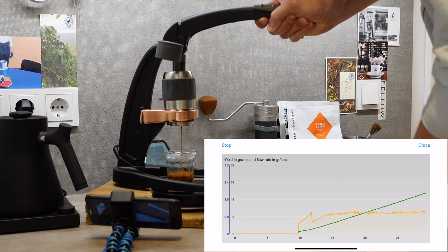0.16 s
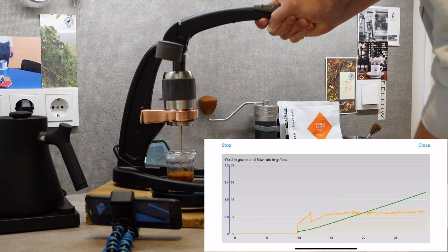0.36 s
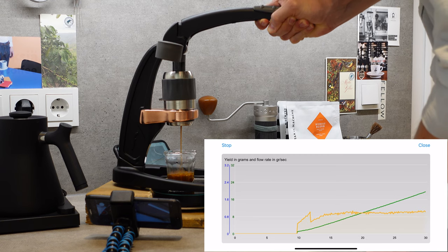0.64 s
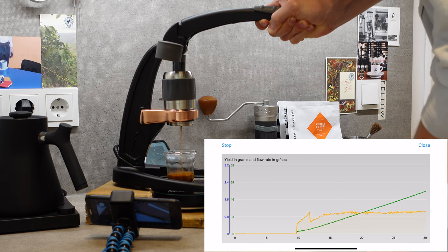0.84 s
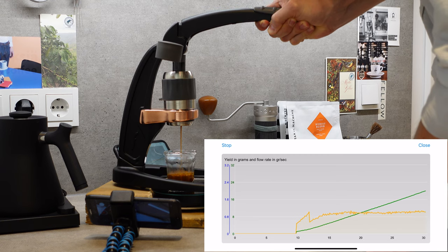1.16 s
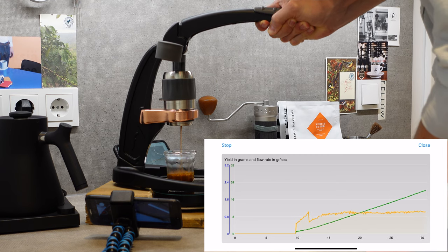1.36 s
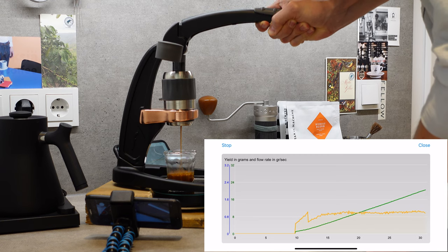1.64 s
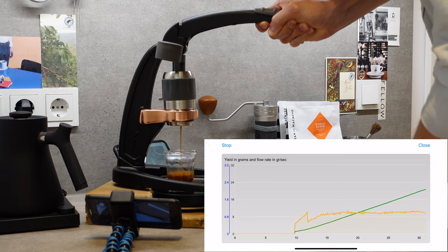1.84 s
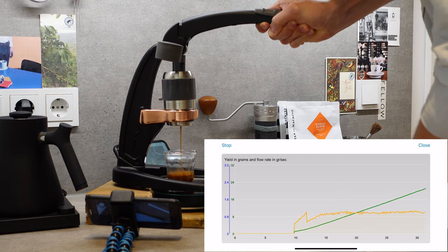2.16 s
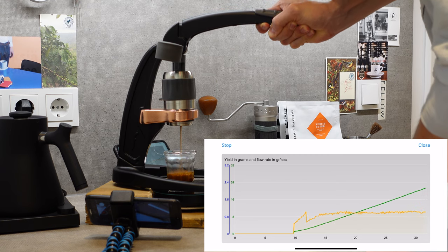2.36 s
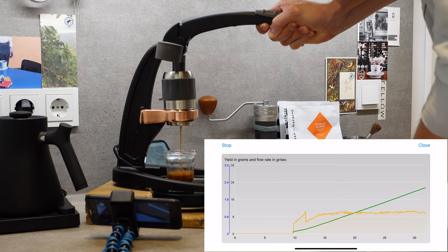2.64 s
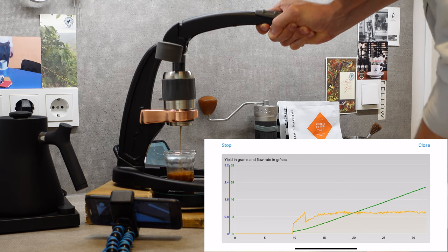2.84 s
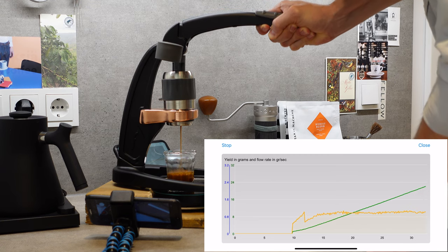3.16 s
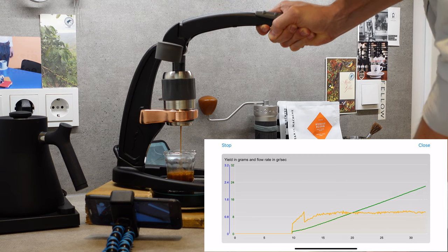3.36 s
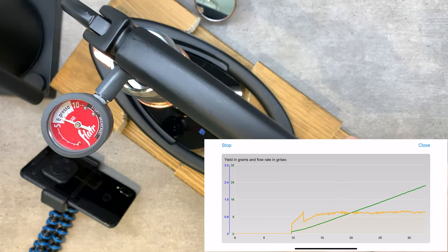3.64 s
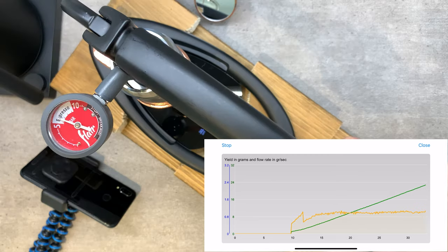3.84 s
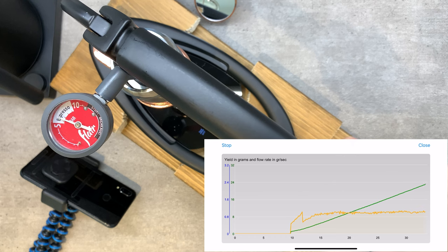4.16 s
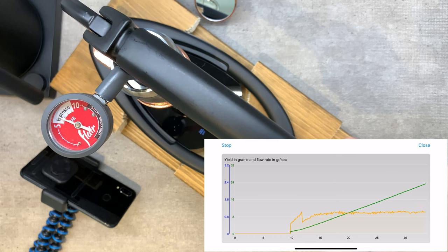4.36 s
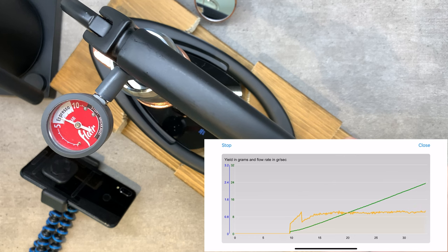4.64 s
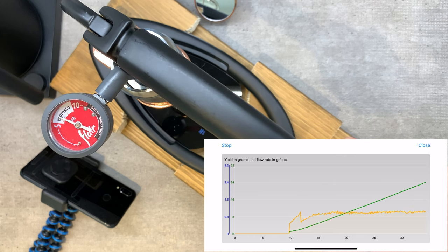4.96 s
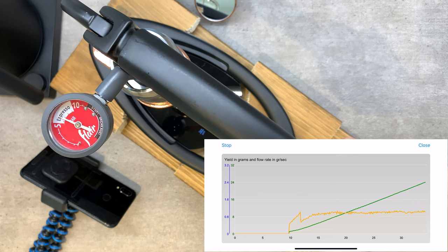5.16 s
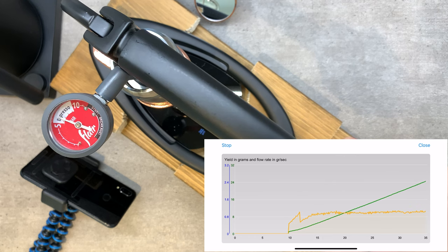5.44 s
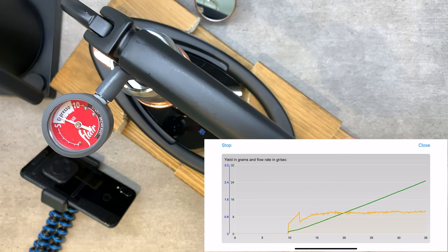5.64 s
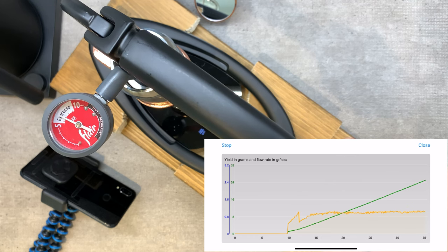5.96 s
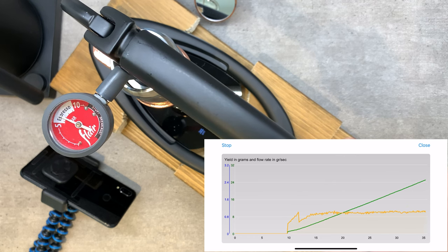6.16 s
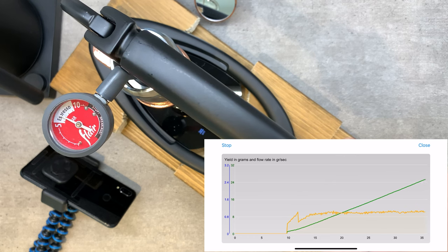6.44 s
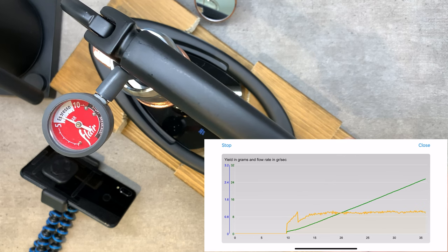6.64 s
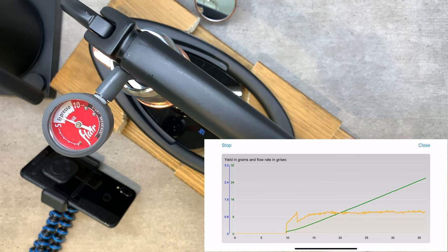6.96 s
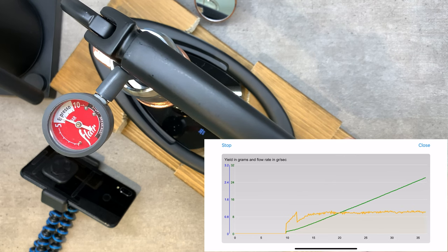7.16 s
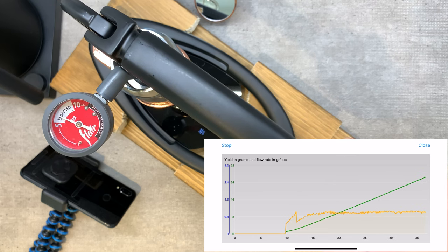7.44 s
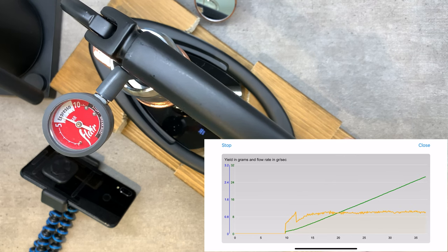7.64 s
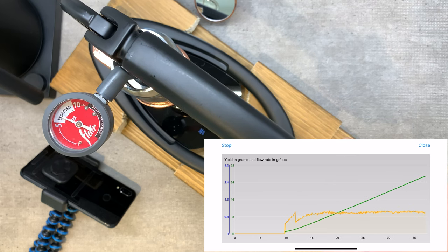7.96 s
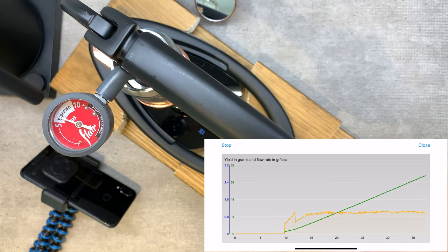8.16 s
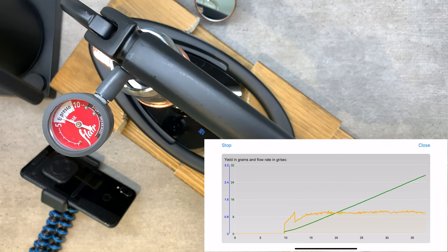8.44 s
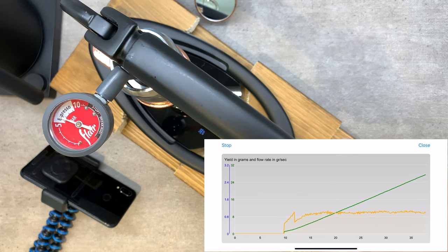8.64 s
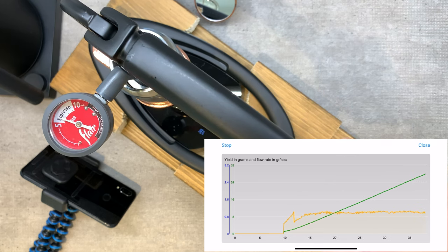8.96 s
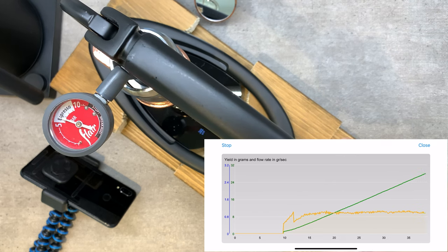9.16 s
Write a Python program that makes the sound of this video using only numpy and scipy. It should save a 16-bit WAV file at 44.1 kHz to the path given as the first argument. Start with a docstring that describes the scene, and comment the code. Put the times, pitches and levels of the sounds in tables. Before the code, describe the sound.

Close stereo sound of espresso dribbling into a little glass in a quiet indoor kitchen. Crisp bubble ticks come in uneven clumps, with a soft watery ring from the air in the glass. Low rumble, thin wash and faint hum stay behind. Two dull bumps fall near three seconds; a clinking bump and a cluster of low thuds follow between about 5.7 and 6.6, then the trickle continues alone.

```python
"""Small glass on a counter in a quiet kitchen, two-port microphone close by, about nine seconds.
From the start a thin coffee stream pops and fizzes: decaying blips that also ring the air in the glass,
higher early on; rumble, wash and hum lie behind it throughout, made of shaped noise and wavering tones.
From half a second faint sine hoots come and go; from one second gurgles blur in as narrow noise.
Near 2.8 s, then between 5.7 and 6.6 s, low sine thuds come through the counter with rattle and clink."""
import sys
import numpy as np
from scipy import signal
from scipy.fft import rfft, irfft, next_fast_len
from scipy.io import wavfile

SR = 44100
rng = np.random.default_rng(int(sys.argv[2]) if len(sys.argv) > 2 else 0)


def output_pcm(signal):
    """Save a mono or channel-first signal as 16-bit PCM at the path in sys.argv[1].

    Samples are clipped to [-1, 1] before scaling.
    """
    pcm = np.clip(np.atleast_2d(signal).T, -1, 1) * 32767
    wavfile.write(sys.argv[1], SR, np.round(pcm).astype(np.int16))


N = 409688

# All levels below are relative: filters, trims and slow drift act on them later.
# Clearest pops at the surface: t/s, tick f/Hz, tick level/dB, tick top level/dB, low edge level/dB,
# first air mode level/dB, second air mode f/Hz, second air mode level/dB
CLEAR_POPS = [(0.0213, 7440, -48.5, -52, -63, -53, 1960, -57),
              (0.1254, 5430, -44.5, -50, -56, -33, 1950, -54),
              (0.1377, 7040, -44, -56, -70, -40, 2040, -61), (0.158, 6950, -69, -72, -73, -44.5, 1920, -71),
              (0.1776, 6310, -55, -60, -55, -39, 2560, -48), (0.228, 7250, -52, -45, -58, -50.5, 2120, -66),
              (0.2654, 7150, -43, -37, -61, -52.5, 2560, -58),
              (0.2938, 9100, -61, -38, -67, -55, 2520, -59), (0.3374, 7500, -56, -69, -68, -44, 2040, -63),
              (0.373, 7000, -51, -71, -57, -49, 2470, -64), (0.3874, 6850, -41.5, -44, -58, -49, 2480, -63),
              (0.418, 5340, -37.5, -57, -67, -53, 2430, -74),
              (0.443, 5630, -35.5, -42, -67, -55, 2310, -77), (0.4558, 6940, -42, -55, -51, -49, 2200, -78),
              (0.494, 7340, -51, -48, -77, -58, 2460, -79),
              (0.5352, 7480, -48, -52, -61, -50.5, 2250, -54.5),
              (0.946, 5570, -42.5, -50, -59, -56, 2470, -70),
              (1.0693, 7560, -40.5, -51, -57, -52, 2500, -43),
              (1.2312, 6700, -45.5, -52, -48, -36, 2400, -44.5),
              (1.244, 6160, -52, -52, -57, -47, 2070, -48), (1.5, 6400, -37.5, -60, -77, -52, 2370, -54),
              (1.527, 7400, -38.5, -61, -75.5, -62, 2500, -50),
              (1.5558, 7550, -40.5, -52, -82, -58, 2010, -50),
              (1.666, 7400, -47.5, -47, -80, -57, 2340, -59), (1.6843, 9300, -67, -31, -80, -71, 2170, -63),
              (1.7134, 8110, -60, -52, -60, -59, 2480, -54),
              (1.7354, 6970, -62, -61, -48, -41.5, 2280, -40.5),
              (1.7439, 7500, -42, -53, -49, -42, 2480, -43),
              (1.753, 6100, -31.5, -48, -51, -40.5, 2500, -48),
              (1.7924, 6200, -64, -50, -55.5, -42, 2390, -47), (1.902, 7600, -48, -78, -82, -48, 1940, -59),
              (1.976, 7510, -59, -56, -61, -49, 2470, -57), (1.991, 6750, -40, -44, -73, -46, 2430, -63),
              (2.1182, 5740, -56, -53, -55, -49, 2470, -68),
              (2.1695, 7000, -49.5, -51, -52, -58, 2500, -57),
              (2.211, 6800, -46, -53, -63, -48.5, 2370, -68),
              (2.2994, 6950, -34, -41.5, -42, -59, 2490, -64),
              (2.3115, 7600, -59, -43, -63, -66, 2070, -61),
              (2.344, 7440, -47, -39.5, -48, -49.5, 1970, -49),
              (2.3575, 8850, -56, -48, -58, -68, 2000, -61), (2.4814, 7800, -52, -49, -64, -57, 2250, -71),
              (2.582, 7900, -47.5, -53, -72, -50, 2460, -62), (2.6967, 5920, -80, -88, -74, -49, 2120, -62),
              (2.7716, 7800, -53.5, -41.5, -59, -63, 2240, -75),
              (3.149, 6110, -86, -69, -89, -46, 2240, -51.5),
              (3.237, 7800, -44.5, -43, -80, -71, 2220, -58), (3.2535, 8050, -56, -52, -75, -66, 2270, -57),
              (3.2624, 9160, -64, -44, -82, -61, 2250, -56),
              (3.3282, 4670, -39.5, -47, -53.5, -54, 2270, -72),
              (3.4057, 5230, -47.5, -72, -56, -44.5, 2320, -53.5),
              (3.475, 9450, -58, -51, -66, -65, 2240, -76), (3.6453, 8500, -60, -71, -72, -43.5, 2070, -61),
              (3.662, 8250, -77, -79, -80, -44.5, 2260, -63),
              (3.7133, 5600, -51.5, -63, -59, -37.5, 2230, -48),
              (3.839, 5490, -60, -59, -67, -42.5, 2220, -48.5),
              (3.8558, 7360, -42, -51, -79, -43.5, 2280, -43),
              (3.9682, 6070, -54, -72, -73, -50, 2290, -50),
              (4.1365, 7000, -49.5, -50, -55, -70, 2320, -56),
              (4.24, 7000, -49.5, -53, -49, -84, 2180, -50),
              (4.3949, 7000, -34, -40, -59, -51.5, 2520, -53), (4.413, 6940, -44, -51, -59, -66, 2480, -57),
              (4.4318, 7450, -49, -48, -50, -56, 2470, -51),
              (4.4518, 6700, -31.5, -44, -62, -48.5, 2410, -54),
              (4.468, 8030, -52, -41, -71, -46.5, 2360, -54), (4.4897, 5700, -35, -54, -70, -53, 2210, -59),
              (4.5033, 6400, -32.5, -39, -75, -57, 2260, -60), (4.515, 6610, -64, -63, -74, -52, 2260, -54),
              (4.5931, 7100, -39, -55, -48, -57, 2240, -69), (4.663, 5400, -41, -58, -58, -58, 2200, -50),
              (4.7296, 7360, -46, -76, -76, -62, 2230, -64), (5.071, 8970, -60, -45, -70, -81, 2250, -78),
              (5.1692, 5840, -47.5, -45, -66, -54, 2240, -55),
              (5.188, 7300, -43.5, -50, -65, -67, 2230, -54), (5.2082, 7340, -42, -50, -76, -63, 2190, -49),
              (5.2212, 7500, -41, -42.5, -78, -73, 2110, -49),
              (5.2305, 6960, -37.5, -49, -80, -82, 2310, -49.5),
              (5.2704, 7400, -40.5, -56, -75, -56, 2150, -44.5),
              (5.282, 8690, -54, -49, -78, -59, 2340, -55), (5.322, 7840, -44.5, -45, -69, -68, 2330, -68),
              (5.35, 6250, -49.5, -72, -70, -53, 2190, -44), (5.408, 5400, -62, -80, -67, -61, 2230, -50.5),
              (5.4385, 6900, -40.5, -44.5, -66, -67, 2170, -65),
              (5.4857, 9080, -72, -44.5, -71, -57, 2380, -60),
              (5.591, 5600, -41.5, -49, -71, -55, 2330, -65), (5.6427, 5790, -66, -61, -68, -50, 2190, -45),
              (5.6754, 6600, -41.5, -35, -51, -58, 2540, -54), (5.708, 5500, -47, -62, -53, -73, 2420, -64),
              (5.9105, 7100, -43, -57, -85, -64, 2330, -60),
              (6.0097, 6190, -63, -67, -72, -49.5, 2020, -54),
              (6.053, 6000, -53.5, -61, -67, -59, 2190, -49), (6.1149, 6560, -55, -51, -66, -69, 2200, -66),
              (6.1647, 6850, -43, -49.5, -56, -61, 2140, -45.5),
              (6.2075, 6300, -42, -55, -71, -50, 2190, -42.5),
              (6.2192, 7170, -67, -49, -72, -52, 1940, -45),
              (6.3355, 7000, -51, -74, -66, -55.5, 2190, -47),
              (6.4072, 6700, -37.5, -48, -73, -62, 2190, -44.5),
              (6.424, 6760, -52, -60, -68, -74, 2460, -59), (6.439, 7000, -39, -44, -63, -46, 2250, -47.5),
              (6.4979, 6050, -31, -51, -54, -69, 2150, -60), (6.5539, 6900, -32, -42, -50, -56, 2190, -46),
              (6.573, 7800, -42, -54, -67, -73, 2160, -56),
              (6.642, 5950, -36.5, -46, -43.5, -56, 2170, -44.5),
              (6.68, 5800, -40, -54, -63, -71, 2200, -49),
              (6.7176, 6900, -37, -39.5, -48.5, -52.5, 2220, -66),
              (6.734, 8500, -44, -51, -67, -64, 2350, -70), (6.7787, 6550, -70, -77, -72, -56, 2150, -47),
              (6.9133, 8800, -43, -57, -68, -67, 2190, -58.5),
              (6.9307, 8500, -51, -47, -84, -73, 2180, -62), (7.0033, 6500, -41, -55, -53, -65, 2130, -49),
              (7.1715, 7900, -35, -51, -72, -61, 2130, -51),
              (7.2828, 6400, -48.5, -79, -71, -57, 2160, -50),
              (7.5716, 6030, -52, -42, -62, -63, 2200, -55), (7.579, 9500, -69, -36, -63, -54.5, 2160, -59),
              (7.6194, 6920, -60, -49, -52, -44.5, 2190, -37),
              (7.6364, 5870, -54, -58, -62, -46, 2330, -47),
              (7.7848, 5960, -44.5, -49, -85, -71, 2200, -66),
              (7.8635, 9500, -57, -42, -65, -66, 2100, -63),
              (7.9021, 7400, -44.5, -43, -62, -62, 2190, -52.5),
              (7.9505, 6690, -56, -67, -57, -54, 2210, -44), (7.961, 6470, -33, -37, -49, -40, 2190, -36.5),
              (7.975, 6070, -41, -51, -57, -40, 2200, -42), (7.9879, 6400, -61, -61, -62, -40.5, 2190, -42),
              (7.9955, 6600, -62, -60, -68, -52, 2260, -53), (8.079, 5650, -41, -60, -72, -78, 2130, -61),
              (8.1092, 6100, -44, -50, -58, -73, 2230, -73),
              (8.3757, 6160, -57, -66, -71, -73, 2150, -46.5),
              (8.3893, 5860, -42, -64, -78, -76, 2140, -52),
              (8.484, 6800, -47.5, -53, -54.5, -50, 2180, -44),
              (8.5282, 6960, -37, -46, -43.5, -59, 2240, -47.5),
              (8.636, 7650, -53, -74, -61, -50, 2120, -50), (8.6539, 6000, -35, -43, -70, -59, 2370, -49.5),
              (8.859, 7900, -49, -51, -62, -49, 2130, -29), (8.8788, 6990, -72, -64, -74, -68, 2130, -59),
              (8.8882, 6700, -55, -43.5, -68, -59, 2190, -37.5),
              (8.8988, 8140, -69, -62, -75, -65, 2200, -41), (8.9121, 6530, -71, -61, -82, -57, 2150, -57),
              (8.9428, 5320, -58, -59, -72, -68, 2200, -47),
              (9.0144, 5540, -36.5, -49, -69, -77, 2120, -64),
              (9.0618, 6900, -41, -44, -43.5, -62, 2150, -66),
              (9.0785, 6450, -46, -55, -53, -53.5, 2150, -56), (9.149, 9500, -66, -46, -73, -70, 2070, -68),
              (9.1868, 8650, -58, -53, -63, -64, 2200, -51.5),
              (9.2454, 7240, -44, -55, -60, -61, 2160, -37),
              (9.2564, 5960, -34, -40.5, -56, -56, 2200, -39.5),
              (2.8208, 7500, -57, -60, -62, -55.5, 2210, -69),
              (2.847, 7500, -57, -69, -72, -56.5, 2210, -69), (2.8801, 7400, -59, -75, -66, -62, 2210, -70),
              (2.9465, 7500, -74, -73, -79, -58, 2220, -66), (2.9877, 7500, -81, -60, -86, -60, 2200, -73),
              (3.088, 7500, -84, -95, -90, -54.5, 2200, -73),
              (5.8166, 6500, -67, -77, -67, -64, 2200, -58.5),
              (8.3015, 7200, -60, -76, -80, -70, 2190, -61), (8.3165, 7100, -55, -79, -80, -76, 2190, -65),
              (8.3385, 7200, -64, -76, -80, -71, 2190, -61), (0.1148, 7950, -80, -86, -81, -52, 1910, -72),
              (0.132, 7200, -59, -61, -76, -83, 1960, -82), (0.2727, 7490, -48, -57, -71, -83, 1900, -61),
              (0.2845, 5840, -64, -57, -84, -83, 2170, -84), (0.3043, 7440, -52, -65, -81, -58, 2520, -55),
              (0.3216, 7210, -72, -67, -83, -54, 2490, -72), (0.5047, 7450, -66, -60, -81, -62, 1910, -82),
              (0.5221, 7330, -76, -54, -81, -83, 1990, -74),
              (0.6648, 7700, -59, -61, -75, -52.5, 2050, -53),
              (0.6834, 6280, -69, -54, -78, -81, 1950, -62), (0.74, 7530, -69, -81, -87, -55, 1910, -72),
              (0.7756, 5750, -50.5, -77, -84, -54, 1910, -80),
              (0.8866, 7400, -58, -56, -73, -70, 2350, -59),
              (0.8981, 7310, -76, -81, -84, -55.5, 1910, -75), (1.032, 7470, -82, -62, -84, -54, 2490, -58),
              (1.0829, 7340, -66, -80, -69, -83, 2410, -59), (1.1112, 7450, -55, -56, -74, -76, 1910, -69),
              (1.1238, 7520, -60, -56, -73, -52, 1970, -55), (1.1904, 8400, -54, -56, -50, -83, 2560, -64),
              (1.2134, 5590, -52, -68, -64, -59, 2600, -53), (1.2252, 5010, -66, -76, -67, -60, 1850, -44),
              (1.2615, 5740, -80, -63, -81, -45, 1890, -46), (1.3119, 7550, -64, -60, -75, -56, 1910, -69),
              (1.4145, 7600, -51, -53, -77, -59, 1960, -52), (1.4239, 7500, -63, -63, -84, -67, 1950, -84),
              (1.437, 7540, -73, -48, -85, -84, 1940, -78), (1.4783, 7410, -59, -51, -79, -70, 1910, -77),
              (1.5137, 7460, -48, -71, -73, -51.5, 2540, -56),
              (1.5411, 7590, -62, -63, -81, -71, 1910, -64),
              (1.6158, 7630, -80, -77, -81, -52, 1930, -51.5),
              (1.6994, 7500, -52, -54, -59, -65, 2120, -58), (1.7274, 5990, -72, -71, -69, -53, 2430, -54),
              (1.7795, 5780, -60, -67, -70, -47, 2480, -82),
              (1.7972, 6070, -80, -81, -81, -83, 2520, -47.5),
              (1.838, 7430, -73, -81, -78, -54.5, 1920, -52), (1.9114, 7860, -67, -81, -79, -60, 1910, -63),
              (1.9284, 7690, -60, -71, -81, -71, 2570, -64), (1.9403, 7750, -52, -54, -61, -58, 2200, -61),
              (2.0025, 7440, -60, -67, -74, -51, 1910, -64), (2.011, 5000, -43.5, -66, -75, -83, 2230, -73),
              (2.028, 7500, -59, -53, -65, -83, 2110, -79), (2.035, 7500, -49, -59, -72, -83, 2120, -73),
              (2.0566, 5810, -69, -53, -84, -56, 2210, -78), (2.1953, 7300, -55, -58, -81, -53, 1930, -57),
              (2.2684, 7480, -54, -64, -60, -59, 2210, -66), (2.2825, 7390, -69, -81, -71, -59, 1930, -68),
              (2.3227, 7430, -80, -81, -65, -83, 2330, -82), (2.387, 6210, -55, -61, -60, -54, 2540, -60),
              (2.469, 7660, -48.5, -54, -59, -52.5, 2260, -65),
              (2.497, 6370, -61, -51, -81, -65, 1910, -77), (2.5181, 7580, -63, -66, -78, -52.5, 1910, -72),
              (2.5676, 7350, -46.5, -61, -77, -60, 2270, -68),
              (2.5915, 7530, -68, -71, -81, -85, 2210, -66), (3.115, 7360, -81, -86, -90, -55, 1910, -69),
              (3.2034, 7770, -59, -62, -81, -87, 2280, -54.5), (3.211, 7540, -55, -58, -81, -52, 2240, -82),
              (3.2286, 7660, -59, -81, -81, -59, 2250, -56), (3.2955, 9260, -71, -57, -81, -66, 2270, -73),
              (3.346, 6350, -51, -63, -71, -74, 1910, -77), (3.3545, 7450, -80, -81, -65, -83, 1920, -82),
              (3.485, 7640, -56.5, -66, -81, -52.5, 2280, -77),
              (3.5621, 6100, -48.5, -57, -53.5, -54.5, 1910, -73),
              (3.6196, 7400, -74, -81, -76, -54, 2140, -71), (3.6308, 5290, -78, -72, -74, -51, 1910, -68),
              (3.6786, 8090, -67, -67, -73, -47, 2230, -56),
              (3.8203, 5010, -82, -81, -79, -49.5, 1910, -65),
              (3.8292, 7610, -64, -73, -63, -85, 2190, -54), (3.8779, 7440, -68, -73, -81, -83, 2160, -62),
              (3.8908, 7440, -63, -103, -83, -53, 2200, -64), (3.9554, 5990, -65, -83, -58, -62, 2240, -69),
              (4.0743, 7740, -57, -79, -81, -52.5, 2110, -72), (4.09, 5840, -54, -49, -71, -76, 2120, -84),
              (4.1881, 7900, -62, -57, -71, -54, 1920, -65), (4.261, 5820, -66, -64, -64, -63, 2180, -57),
              (4.3012, 7520, -66, -78, -76, -57, 1910, -60), (4.3254, 5910, -77, -84, -83, -58, 2230, -55),
              (4.6033, 7350, -80, -53, -83, -66, 1910, -74), (4.677, 5770, -68, -76, -68, -74, 2060, -66),
              (4.6846, 6370, -70, -72, -72, -83, 2230, -60), (4.709, 6000, -65, -79, -75, -52.5, 1910, -66),
              (5.0464, 7860, -57, -51, -60, -81, 2560, -82), (5.1002, 7810, -80, -74, -81, -55, 1910, -65),
              (5.1223, 8440, -71, -51, -82, -54.5, 1910, -65),
              (5.1543, 7560, -69, -46, -62, -85, 2450, -82), (5.202, 7400, -80, -67, -78, -76, 2290, -56),
              (5.2487, 7320, -59, -60, -81, -59, 2150, -78), (5.3298, 7640, -57, -81, -69, -48, 1900, -52),
              (5.39, 5940, -68, -81, -81, -76, 2190, -55), (5.619, 6770, -59, -70, -64, -59, 2160, -59),
              (5.9627, 7040, -53, -58, -67, -63, 2150, -69),
              (6.0235, 5670, -51.5, -52, -78, -59, 2190, -62),
              (6.0342, 7420, -56, -68, -74, -55, 2070, -66), (6.1896, 7340, -63, -70, -78, -76, 2250, -65),
              (6.2593, 7340, -80, -81, -83, -53, 1930, -57),
              (6.3865, 6400, -51, -75, -55.5, -83, 2150, -82), (6.519, 6780, -78, -81, -54, -83, 1910, -82),
              (6.6256, 6100, -68, -54, -68, -83, 2120, -82), (6.6734, 7300, -42, -60, -62, -70, 2150, -82),
              (6.693, 5930, -63, -81, -61, -69, 2090, -82), (6.709, 5630, -68, -68, -64, -58, 2110, -67),
              (6.7495, 6830, -58, -60, -81, -55, 2230, -60), (6.8008, 6290, -75, -81, -83, -83, 2130, -55),
              (6.8258, 6400, -58, -49, -87, -72, 2140, -59), (7.085, 6600, -55, -59, -65, -62, 2200, -53.5),
              (7.189, 6720, -56, -71, -77, -70, 2230, -57), (7.2326, 7460, -53, -57, -76, -83, 2210, -82),
              (7.2474, 6560, -49.5, -67, -81, -64, 2150, -72), (7.356, 6430, -83, -57, -69, -57, 2170, -73),
              (7.5604, 7250, -61, -78, -71, -54, 1910, -63), (7.5893, 6130, -66, -61, -62, -83, 2230, -58),
              (7.654, 5520, -67, -75, -69, -52, 2220, -57), (7.6748, 5900, -71, -78, -81, -51, 2190, -56),
              (7.7485, 6360, -53, -53.5, -82, -66, 2230, -63), (7.922, 8400, -47, -61, -72, -59, 2190, -67),
              (8.0113, 7220, -72, -66, -81, -61, 2130, -55), (8.021, 7350, -80, -81, -75, -55, 1880, -53),
              (8.0886, 5670, -53, -54, -57, -77, 2170, -64),
              (8.2424, 8610, -70, -50.5, -71, -75, 2110, -80),
              (8.2894, 6610, -82, -81, -72, -79, 2190, -58.5),
              (8.3634, 6430, -58, -77, -76, -69, 2110, -62), (8.4193, 7450, -57, -68, -81, -83, 2200, -82),
              (8.4581, 6350, -74, -79, -74, -77, 2210, -56), (8.543, 6440, -53, -55, -65, -67, 1920, -64),
              (8.6201, 7100, -49, -79, -70, -63, 1910, -64), (8.683, 5860, -66, -81, -80, -83, 2570, -82),
              (8.6992, 7500, -54, -52, -81, -60, 1900, -62), (8.7264, 6500, -54, -61, -81, -53, 2190, -53),
              (8.7769, 7200, -53.5, -53, -80, -70, 2270, -57),
              (8.8309, 8610, -65, -50, -81, -60, 2160, -67), (8.8405, 8750, -67, -50, -83, -81, 2150, -70),
              (8.9612, 8530, -66, -59, -81, -75, 2180, -54), (9.0298, 6360, -52, -73, -81, -75, 2200, -69),
              (9.0395, 5980, -52, -78, -57, -70, 2160, -57), (9.0525, 6330, -50, -71, -57, -68, 2150, -69),
              (9.1048, 6130, -58, -62, -59, -63, 2440, -72), (9.139, 7430, -63, -49, -63, -56, 2200, -55)]
# Two modes of the air in the glass: usual f/Hz, rise t/s, left-right level/dB, left lag t/s
AIR_MODES = [(1525, 0.0029, -2, 0.000059), (2190, 0.0015, -4.5, 0.0014)]
# How busy the small pops are: t/s, ticks level/dB, tick tops level/dB, ringing air level/dB
FIZZ_LEVELS = [(0.0, -73, -91, -64.5), (0.31, -84, -92, -71.5), (0.82, -81, -88, -72.5),
               (2.3, -89.5, -87, -72), (2.89, -87, -85.5, -75.5), (4.42, -83, -96, -70.5),
               (4.55, -81.5, -91, -73.5), (4.99, -81.5, -89, -72), (5.3, -83, -87, -71.5),
               (5.85, -88.5, -92.5, -78), (6.44, -81, -87, -70), (6.6, -103, -93, -78),
               (6.75, -86.5, -102, -76), (7.5, -86.5, -91, -75.5), (7.94, -108, -102, -73),
               (8.28, -96, -93, -82.5), (8.49, -90, -97, -71), (9.29, -84.5, -99, -74)]
# Sizes of the small pops: f/Hz, level/dB
FIZZ_SIZES = [(3700, 4), (4400, -64), (5200, -9.5), (6000, -1.5), (6700, -45), (7500, -3), (8500, -31),
              (9500, -49), (10500, 4), (11500, -24), (12500, 2.5), (13700, 9), (15500, 0)]
# Humps and hollows the glass gives every tick: f/Hz, level/dB
GLASS_COLOUR = [(2500, 1.5), (3300, -9), (3900, -13), (4800, -11.5), (6200, 2.5), (6800, -8.5), (7400, 1),
                (8100, -1.5), (8700, -1), (9900, -0.5), (11000, 2), (13500, -8.5), (14500, -2),
                (16000, -14)]
# Deeper gurgles: t/s, level/dB
GURGLE_EVENTS = [(1.13, -65), (2.286, -62), (2.348, -59), (2.704, -59), (4.954, -65), (6.78, -59),
                 (7.623, -59), (7.965, -55.5), (8.641, -54), (8.86, -64), (9.146, -58)]
# Soft thuds through the counter: t/s, level/dB, f/Hz, rattle against thud level/dB,
# clink against thud level/dB, rise t/s, roundness (exponent of the swell), clink lead t/s
THUD_EVENTS = [(2.7628, -27.5, 86.4, -20, -30, 0.028, 4.6, 0.0048),
               (2.846, -33, 73.5, -50, -33, 0.0079, 1.3, .014),
               (5.69, -31.5, 89.4, -13, -15, 0.013, 0.48, 0.015),
               (5.798, -36.5, 105, -51, -52, 0.01, 2.2, .014),
               (6.054, -32.5, 105, -32.5, -57, 0.012, 1.6, 0.016),
               (6.132, -33.5, 70, -30, -55, 0.009, 1.2, .014), (6.207, -32, 81, -41, -52, 0.011, 1.9, .014),
               (6.282, -36.5, 98, -53, -53, 0.013, 1.9, .014),
               (6.362, -34.5, 86, -46, -41, 0.011, 2.1, .014),
               (6.449, -36.5, 78.4, -34, -23, 0.013, 1.47, .014),
               (6.533, -34.5, 86, -51, -50, 0.012, 2.1, .014)]
# Resonances of the rattle: f/Hz, width f/Hz, level/dB
RATTLE_MODES = [(163.2, 13.3, 18.5), (189, 9.4, 10), (250, 24, 6), (290, 26, 9), (352, 23, 3),
                (517, 700, -21)]
# Resonances of the clink: f/Hz, width f/Hz, level/dB
CLINK_MODES = [(640, 120, -8), (950, 90, -5), (1100, 80, 1), (1486, 100, -6), (2080, 250, -12),
               (2450, 250, -12), (3170, 130, -7), (3620, 220, -1), (4300, 900, -18), (6000, 1500, -28)]
# Faint brief hoots: start t/s, length t/s, level/dB
HOOT_EVENTS = [(0.534, 0.15, -75.5), (2.506, 0.16, -72.5), (3.951, 0.052, -72.5), (4.31, 0.14, -71.5),
               (4.742, 0.064, -72.5), (5.471, 0.034, -68), (8.131, 0.043, -71.5)]
# Room noise spectrum: f/Hz, level per Hz/dB
ROOM_SPECTRUM = [(20, -21.5), (35, -21), (54, 4), (66, 2), (88, -2.5), (108, -2), (130, 1.5), (150, -11),
                 (215, -36), (275, -25.5), (310, -30), (500, -23), (740, -23.5), (860, -33.5), (1300, -36),
                 (2400, -40), (3200, -56.5), (5000, -55), (9000, -76)]
# Rumble course: t/s, level/dB
RUMBLE_LEVELS = [(0.0, -45.5), (0.67, -50.5), (1.11, -46.5), (1.29, -51), (2.38, -52), (2.51, -50.5),
                 (3.78, -50.5), (4.22, -52.5), (4.47, -48), (5.33, -49.5), (5.59, -45), (6.0, -49.5),
                 (6.34, -45), (7.14, -48), (8.87, -51.5), (9.29, -49)]
# Room likeness between the ports: f/Hz, left-right likeness (0 to 1)
PORT_LIKENESS = [(50, 0.98), (130, 0.91), (290, 0.21), (640, 0.12), (1400, 0.011)]
# Room balance between the ports: f/Hz, left-right level/dB
PORT_BALANCE = [(60, -2.5), (200, 1), (350, -11), (700, -3.5), (2000, 2)]
# Hum lines: multiple of HUM_HZ, level/dB
HUM_LINES = [(1, -55.5), (2, -60.5), (3, -82), (6, -78), (8, -74.5), (9, -76), (11, -74.5)]
# Another faint steady-pitched line: f/Hz, level/dB
SIDE_LINES = [(495, -84.5)]

TICK_LOW_HZ, TICK_TOP_HZ = 3660, 12360  # centres of the scattered low edge and top; the top is higher early on
LOW_RISE_S, LOW_SPRAY_S = 0.00028, 0.0056  # the low edge of a tick is a softer, longer spray
SPLASH_DB, SPLASH_RISE_S, SPLASH_WIDTH_HZ = -7, .006, 1300  # a brief wash follows the low edge
PLACES = 5  # spots on the surface, each with its own reflections
SETTLE_S = 2.06  # time at which the early effects have halved
TOP_EARLY = 0.086  # share by which the tops lie higher early on
RING_EARLY, RING_SCATTER = 0.027, 0.019  # first air mode: early share above usual pitch, and scatter
SECOND_EARLY_DB = -4  # the small pops ring the second air mode more weakly early on
LEAN_DB_PER_HZ = -0.0029  # a ring above its usual pitch leans further right
CLUMP_DB, CLUMPS_PER_S = 8.5, 12.  # the small pops come in clumps
DROPS_PER_S, DROP_JITTER, DROP_SPREAD_DB = 65, .4, 3.5  # the rate is before the jitter stretches the gaps
PORT_LAG_S, PORT_LEAD_S, PORT_TURN_HZ = 8.8 / 44100, 22 / 44100, 5000
GURGLE_HZ, GURGLE_RISE_S, GURGLE_WIDTH_HZ = 737, 0.018, 150
CLINK_LOW_T60_S, CLINK_HIGH_T60_S, CLINK_SPLIT_HZ = .28, .15, 2800  # the high clack dies sooner
CLACK_FULL_DB, CLACK_SLOPE = -19, .9  # a weaker clink is also duller
HOOT_HZ = 269.7
SURGE_DB, WASH_DB, WASH_WANDER_DB = 2.5, -51.5, 1.2
HUM_HZ = 58.68
FUZZY_BELOW_HZ, FUZZ_PER_S, FUZZ_SHARE = 400, 14, 0.76  # low hum lines flutter in strength and phase
EDGE_HZ = 16300


def trickle():
    """All pops at the two ports, with the reflections of glass, counter and walls."""
    ticks, rings = pops()
    small_ticks, small_rings = fizz()
    # The stream strays: the small pops move from spot to spot
    spot_now = np.arange(N) // 2000 % PLACES == np.arange(PLACES)[:, None]
    ticks += small_ticks * spot_now
    ticks = shaped(ticks, lambda hz: gain_of(read(GLASS_COLOUR, hz)))
    rings += small_rings

    taps = gain_of(-6) * tail(0.016, 0.0021, channels=PLACES)
    taps += gain_of(-5.5) * tail(.2, .004, channels=PLACES, build=.008)
    taps[:, 0] = 1  # direct sound
    taps[:, 42] = .7  # a near surface sends each tick back within a millisecond
    near = signal.oaconvolve(ticks, taps, axes=1)[:, :N].sum(0)
    pair = np.array([near, shaped(near, right_port)])
    far_taps = tail(.25, .004, channels=2, build=.012)
    pair += gain_of(-8) * signal.oaconvolve(ticks.sum(0)[None], far_taps, axes=1)[:, :N]

    rings += gain_of(-12) * signal.oaconvolve(rings, tail(0.16, .006, channels=1), axes=1)[:, :N]
    rings += gain_of(-6.5) * signal.oaconvolve(rings, tail(0.22, 0.0013, channels=2), axes=1)[:, :N]
    return pair + rings


def pops():
    """Clear pops: bubble blips as ticks (one row a place) and the air rings they excite (two channels)."""
    ticks, rings = np.zeros((PLACES, N)), np.zeros((2, N))
    splash_band = peaks([(1.07 * TICK_LOW_HZ, SPLASH_WIDTH_HZ, 0)])
    wash = evened(shaped(rng.standard_normal(N + 2000), splash_band))
    wash_shape = swell(np.arange(2000) / SR, SPLASH_RISE_S)
    for n, (row, luck) in enumerate(zip(CLEAR_POPS, rng.random((len(CLEAR_POPS), 22)))):
        s, hz, db, top_db, low_db, first_db, second_hz, second_db = row
        place = ticks[n % PLACES]
        twin_hz = hz * (0.773 + .4 * luck[1])  # a twin of another size
        twin = 0.66 * tick(twin_hz, 0.00027, luck[2], 0.000605)
        sound = gain_of(db) * (tick(hz, 0.00025, luck[0]) + twin)
        # Sprays of three at the top and at the low edge
        for pitch, turn, late, low_pitch, low_turn, low_late in luck[4:].reshape(3, 6):
            top_hz = TICK_TOP_HZ * (1 + TOP_EARLY * early(s) + .38 * (pitch - .5))
            sound += gain_of(top_db) * tick(top_hz, 0.00018, turn, 0.0022 * late)
            low_hz = TICK_LOW_HZ * (1 + .3 * (low_pitch - .5))
            sound += gain_of(low_db) * tick(low_hz, LOW_RISE_S, low_turn, LOW_SPRAY_S * low_late)
        add(place, s, sound)
        splash = wash_shape * wash[round(s * SR):][:2000]
        add(place, s, gain_of(low_db + SPLASH_DB) * splash)

        first_hz = AIR_MODES[0][0] * (1 + RING_EARLY * early(s) + RING_SCATTER * (2 * luck[3] - 1))
        add(rings, s, gain_of(first_db) * air(AIR_MODES[0], first_hz, 2 * np.pi * luck[1]))
        add(rings, s, gain_of(second_db) * air(AIR_MODES[1], second_hz, 2 * np.pi * luck[2]))
    return ticks, rings


def fizz():
    """Many smaller pops that fill the gaps; one drop sounds in several bubble sizes at once."""
    ticks, rings, shared = np.zeros(N), np.zeros((2, N)), drops()
    clumps = [evened(gain_of(CLUMP_DB * wander(CLUMPS_PER_S))) for _ in range(2)]  # low and top sizes
    for hz, db in FIZZ_SIZES:
        is_top = int(hz > 9000)
        train = shared * rng.standard_normal(N) + .4 * sparse(200, 4.)
        level = gain_of(curve(FIZZ_LEVELS, 1 + is_top) + db) * clumps[is_top]
        blip = tick(hz, .00035, 0)
        ticks += level * evened(signal.oaconvolve(train, blip)[:N])

    second_db = -10.5 + SECOND_EARLY_DB * early(np.arange(N) / SR)
    for mode, db in zip(AIR_MODES, (-5.5, second_db)):
        for detune in .9, .97, 1.01, 1.05, 1.13:
            train = shared * rng.standard_normal(N) + 0.25 * sparse(80, 3.5)
            ring = signal.oaconvolve(train[None], air(mode, mode[0] * detune, 0), axes=1)[:, :N]
            rings += gain_of(curve(FIZZ_LEVELS, 3) + db) * evened(ring)
    return ticks, rings


def tick(hz, rise, turn, lag=0.):
    """A tiny bubble: a soft-edged, quickly dying sine blip."""
    t = np.arange(500) / SR - lag
    return swell(t, rise) ** 2 * np.sin(2 * np.pi * (hz * t + turn))


def air(mode, hz, phase):
    """One soft-edged ring of an air mode as the two ports hear it, apart in level and arrival."""
    usual_hz, rise, lean_db, lag = mode
    lean_db = lean_db + LEAN_DB_PER_HZ * max(hz - usual_hz, 0)
    t = np.arange(900) / SR - np.array([[lag], [0]])
    ring = swell(t, rise) ** 1.6 * np.sin(2 * np.pi * hz * t + phase)
    return gain_of([[lean_db / 2], [-lean_db / 2]]) * ring


def early(s):
    """1 at the start, falling towards 0 as the glass fills past its narrow foot."""
    return 1 / (1 + (s / SETTLE_S) ** 4)


def drops():
    """The stream breaks into an uneven chain of drops: clicks of random size."""
    gap, size = rng.standard_normal((1200, 2)).T
    at = (np.cumsum(np.exp(DROP_JITTER * gap)) * SR / DROPS_PER_S).astype(int)
    chain = np.zeros(N)
    chain[at[at < N]] = gain_of(DROP_SPREAD_DB * size[at < N])
    return evened(chain)


def sparse(per_s, spread_db):
    """Clicks at random times, a few of them large."""
    size = gain_of(spread_db * np.minimum(rng.exponential(1, N), 4))
    return evened(size * (rng.random(N) < per_s / SR))


def tail(t60, start, channels, build=0.00089):
    """Dense reflections that build up and die away, energy 1."""
    t = np.arange(SR // 4) / SR
    envelope = gain_of(-60 * t / t60) * np.clip((t - start) / build, 0, 1)
    taps = rng.standard_normal((channels, len(t))) * envelope
    return taps / np.linalg.norm(taps, axis=1, keepdims=True)


def right_port(hz):
    """Treble arrives a little late and upside down, lower sound early; louder where the two meet."""
    late = -np.exp(-2j * np.pi * hz * PORT_LAG_S)
    lead = np.exp(2j * np.pi * hz * PORT_LEAD_S)
    boost_db = 10.2 / (1 + ((hz - PORT_TURN_HZ) / 600) ** 2)
    return np.where(hz > PORT_TURN_HZ, late, lead) * gain_of(boost_db)


def gurgles():
    """Larger bubbles in a blur: a slow swell of noise around one pitch."""
    out, t = np.zeros(N), np.arange(4000) / SR
    noises = rng.standard_normal((len(GURGLE_EVENTS), len(t)))
    for (s, db), noise in zip(GURGLE_EVENTS, noises):
        blur = evened(shaped(noise, peaks([(GURGLE_HZ, GURGLE_WIDTH_HZ, 0)])))
        add(out, s, gain_of(db - 4.5) * swell(t, GURGLE_RISE_S) * blur)
    return out * gain_of([[-1.2], [1.2]])


def thuds():
    """A few low cycles; what stands on the counter rattles and clinks, starting just ahead of the bass."""
    out, t = np.zeros((2, N)), np.arange(SR // 6) / SR
    for s, db, hz, rattle_db, clink_db, rise, roundness, lead in THUD_EVENTS:
        boom = swell(t, rise) ** roundness * np.sin(2 * np.pi * hz * t)
        rattle = evened(shaped(rng.standard_normal(len(t)), peaks(RATTLE_MODES)))
        boom += gain_of(rattle_db - 0.5) * swell(t, 0.019) * rattle
        add(out, s, gain_of(db) * boom * gain_of([[-.6], [.6]]))

        noise = rng.standard_normal((2, len(t)))
        noise = noise + 0.096 * noise[::-1]  # each port hears a little of the other
        clink = evened(shaped(noise, peaks(CLINK_MODES)))
        high = shaped(clink, lambda f: f > CLINK_SPLIT_HZ)
        low = (clink - high) * gain_of(-60 * t / CLINK_LOW_T60_S)
        clack_db = CLACK_SLOPE * (clink_db - CLACK_FULL_DB)
        clink = high * gain_of(clack_db - 60 * t / CLINK_HIGH_T60_S) + low
        add(out, s - lead, gain_of(db + clink_db) * clink * np.minimum(t / 0.0013, 1))
    return out


def hoots():
    """Short soft swells of one low sine tone, stronger at the left port."""
    out = np.zeros(N)
    for s, length, db in HOOT_EVENTS:
        t = np.arange(0, length, 1 / SR)
        add(out, s, gain_of(db + 5) * np.sin(np.pi * t / length) * np.sin(2 * np.pi * HOOT_HZ * t))
    return out * gain_of([[2.], [-4.]])


def room():
    """Low rumble that swells, a soft wash above it, and a wavering hum; the ports agree most in the bass."""
    def same(hz):
        """Left-right likeness at a frequency."""
        return np.clip(read(PORT_LIKENESS, hz), 0, 1)

    def colour(hz):
        """Room spectrum at each port."""
        side = np.array([[.5], [-.5]])
        return gain_of(read(ROOM_SPECTRUM, hz) + side * read(PORT_BALANCE, hz))

    left, other = rng.standard_normal((2, N))
    right = shaped(left, same) + shaped(other, lambda hz: np.sqrt(1 - same(hz) ** 2))
    pair = evened(shaped(np.array([left, right]), colour))
    low = shaped(pair, lambda hz: 1 / (1 + (hz / 180) ** 8))
    out = gain_of(curve(RUMBLE_LEVELS, 1) + SURGE_DB * wander(6.)) * low
    out += gain_of(WASH_DB + WASH_WANDER_DB * wander(3.1)) * (pair - low)

    t = np.arange(N) / SR
    for hz, db in [(k * HUM_HZ, db) for k, db in HUM_LINES] + SIDE_LINES:
        waver_db = 1.2 + 2.5 * np.exp(-hz / 150)  # the high lines hold steadier
        turns = hz * t + 0.19 * wander(2.5)
        apart = np.arccos(same(hz)) * np.array([[0], [1]])  # phase between the ports
        fuzz = FUZZ_SHARE * (hz < FUZZY_BELOW_HZ)
        flutter = 1 - fuzz + fuzz * (wander(FUZZ_PER_S) + 1j * wander(FUZZ_PER_S))
        line = (flutter * np.exp(1j * (2 * np.pi * turns + apart))).real
        out += gain_of(db + 4.0 + waver_db * wander(4.)) * line
    return out


def gain_of(db):
    """Decibels to a factor."""
    return 10 ** (np.asarray(db) / 20)


def evened(x):
    """Scales to rms 1."""
    return x / np.sqrt(np.mean(x ** 2) + 1e-20)


def read(points, hz):
    """Straight lines on a log-frequency axis."""
    f, value = np.transpose(points)
    return np.interp(np.log(hz + 1), np.log(f + 1), value)


def curve(rows, column):
    """One column of a table, sample by sample."""
    rows = np.array(rows)
    return np.interp(np.arange(N) / SR, rows[:, 0], rows[:, column])


def add(mix, s, sound):
    """Mixes a sound in at time s."""
    part = mix[..., round(s * SR):][..., :sound.shape[-1]]
    part += sound[..., :part.shape[-1]]


def shaped(x, gain):
    """Filters by a gain that is a function of Hz."""
    size = next_fast_len(x.shape[-1])
    return irfft(rfft(x, size) * gain(np.fft.rfftfreq(size, 1 / SR)), size)[..., :x.shape[-1]]


def peaks(modes):
    """A gain made of resonant humps (f/Hz, width f/Hz, level/dB)."""
    return lambda f: sum(gain_of(db) / (1 + (2 * (f - hz) / width) ** 2) for hz, width, db in modes)


def swell(t, rise):
    """Rises for the time rise, then dies away; top 1."""
    u = np.maximum(t, 0) / rise
    return u * np.exp(1 - u)


def wander(per_s):
    """Slow random drift: straight lines between normal random knots."""
    knots = rng.standard_normal(200)
    return np.interp(np.arange(N) / SR * per_s, np.arange(200), knots)


def scene():
    """Trickle, gurgles, thuds, hoots and room."""
    return trickle() + gurgles() + thuds() + hoots() + room()


def record(dry):
    """The band limit: a steep low-pass on both channels."""
    low_pass = signal.firwin(511, EDGE_HZ, window=("kaiser", 9), fs=SR)
    return signal.oaconvolve(dry, low_pass[None], "same")


dry = scene()
out = record(dry)
output_pcm(out)
```